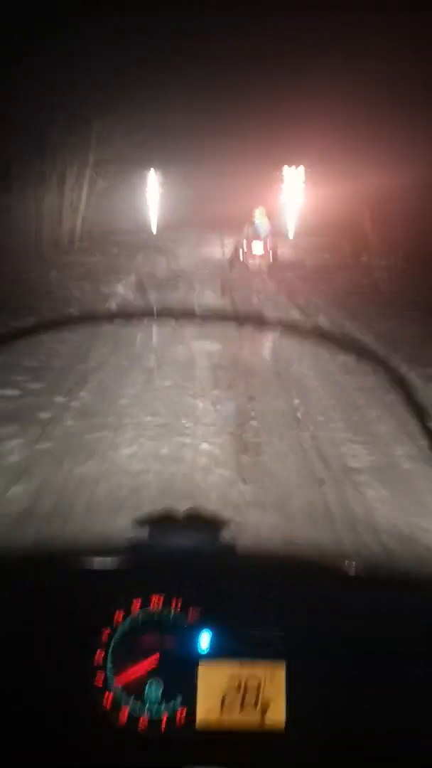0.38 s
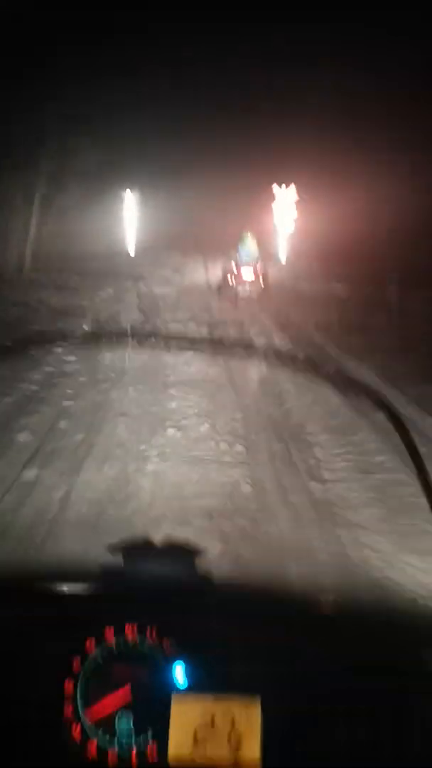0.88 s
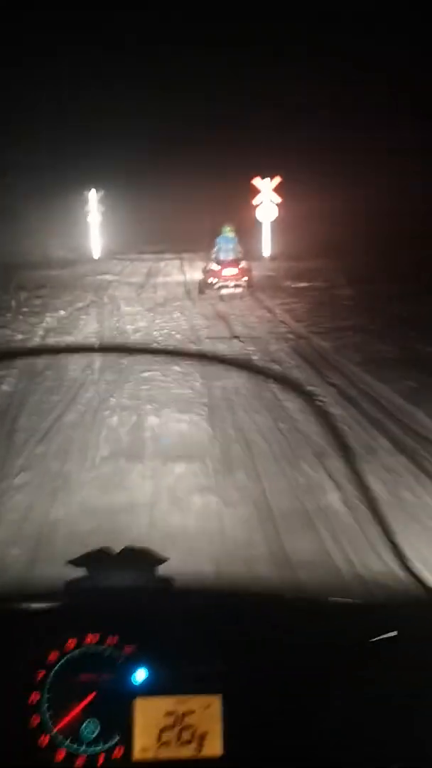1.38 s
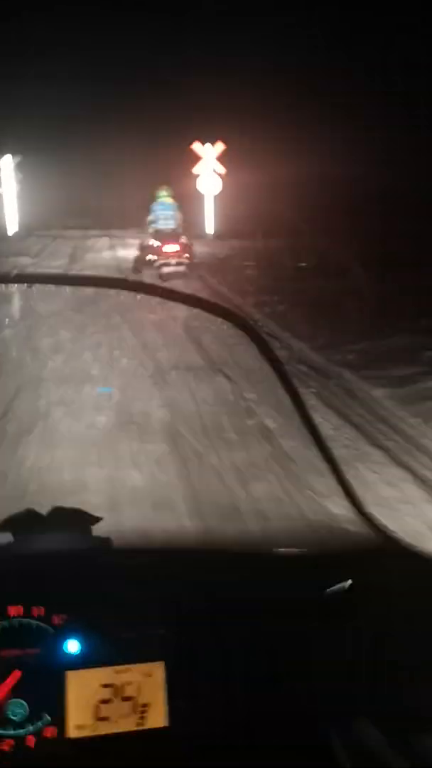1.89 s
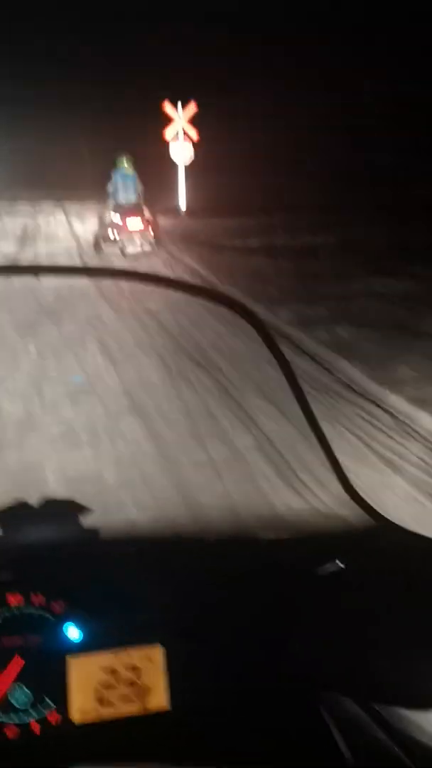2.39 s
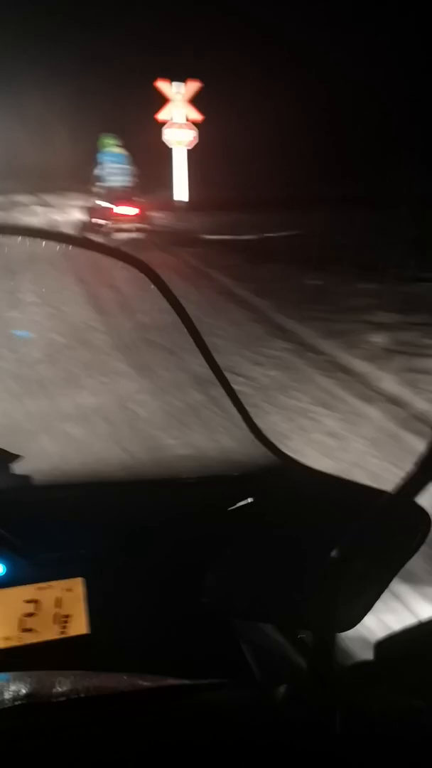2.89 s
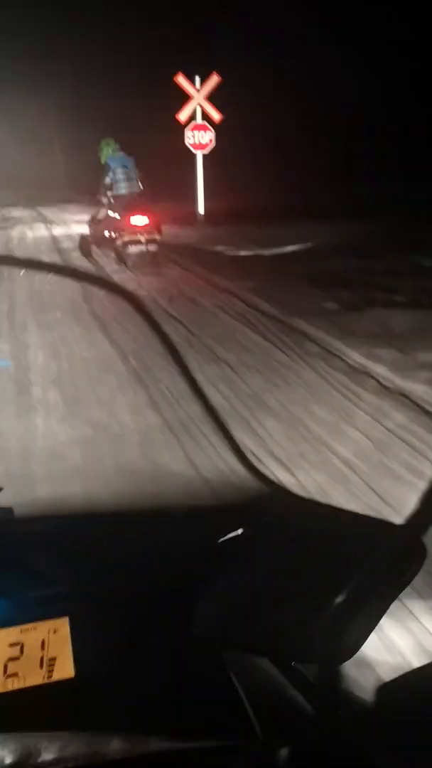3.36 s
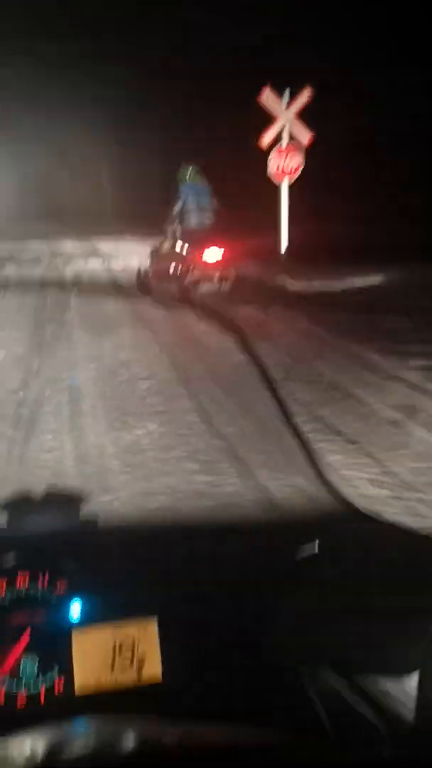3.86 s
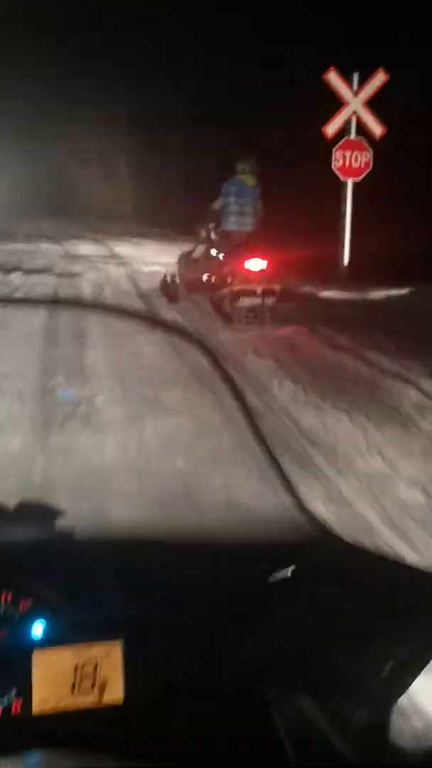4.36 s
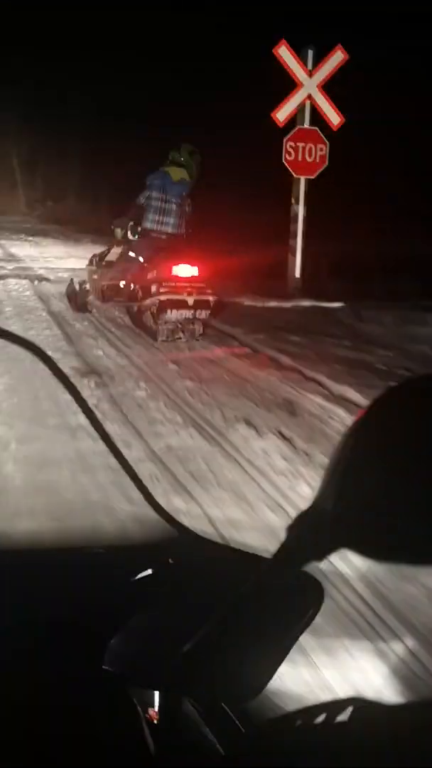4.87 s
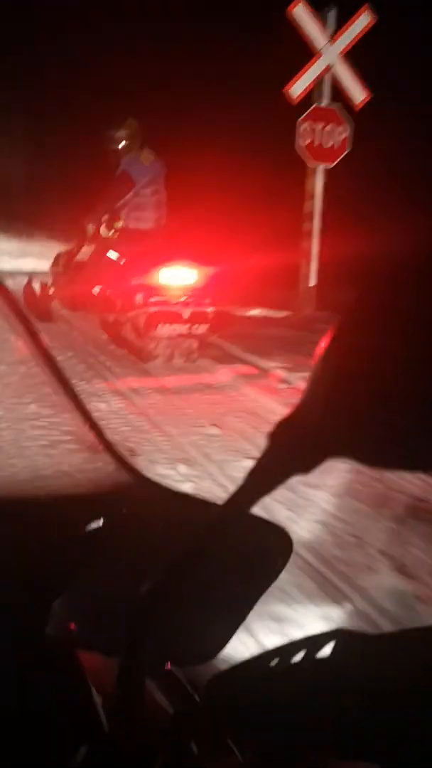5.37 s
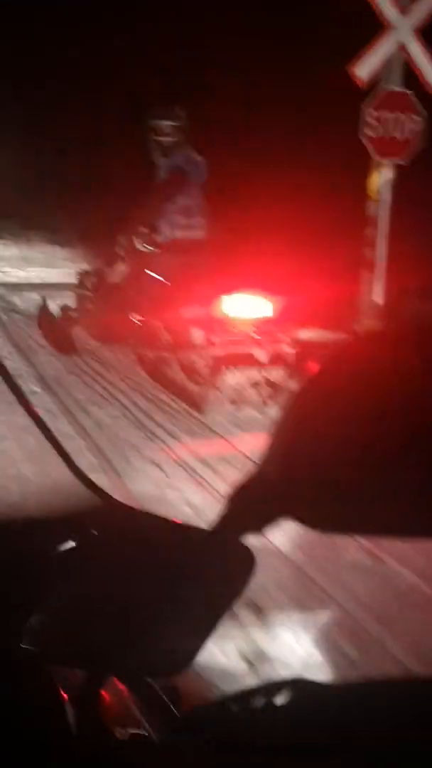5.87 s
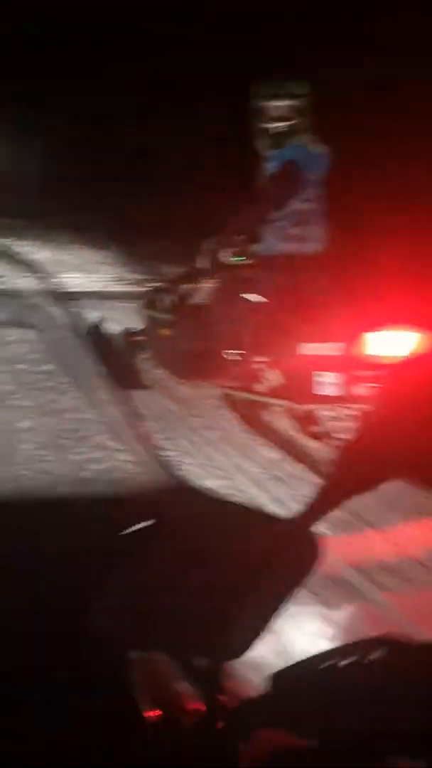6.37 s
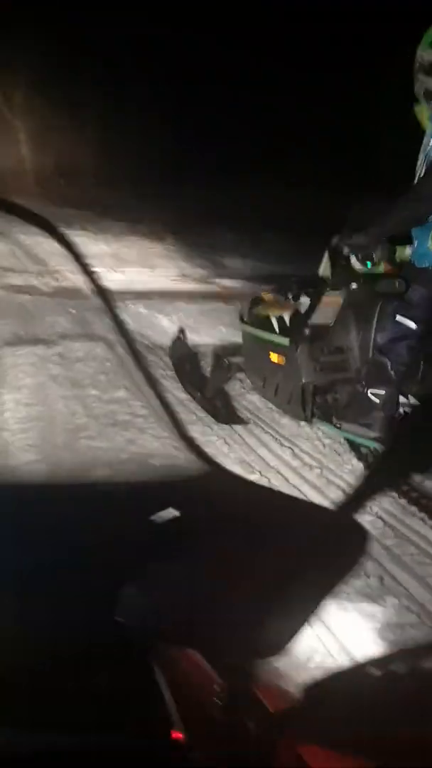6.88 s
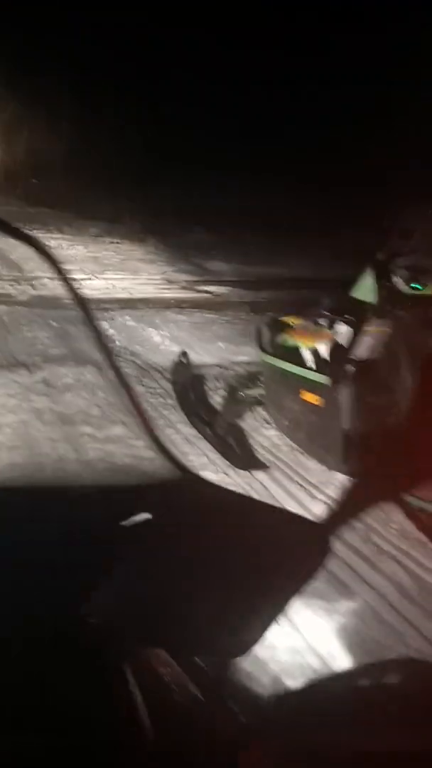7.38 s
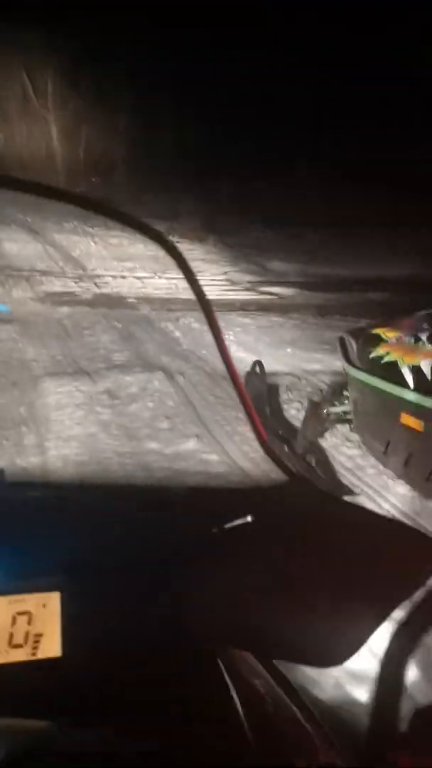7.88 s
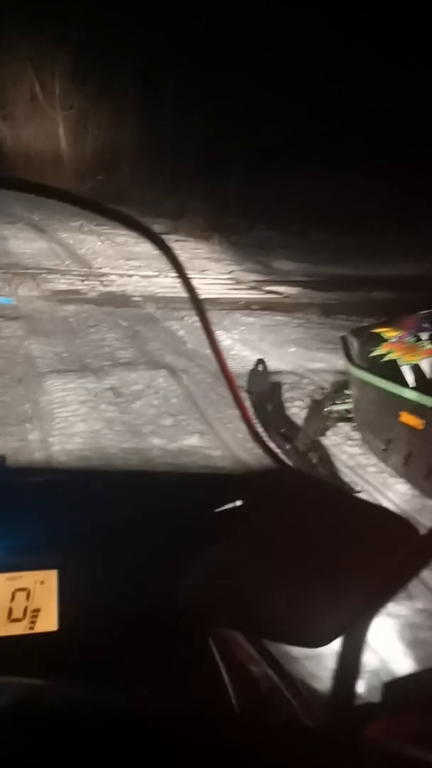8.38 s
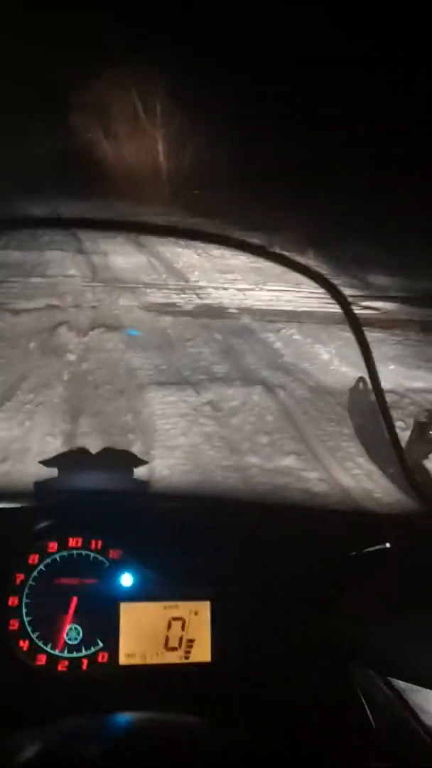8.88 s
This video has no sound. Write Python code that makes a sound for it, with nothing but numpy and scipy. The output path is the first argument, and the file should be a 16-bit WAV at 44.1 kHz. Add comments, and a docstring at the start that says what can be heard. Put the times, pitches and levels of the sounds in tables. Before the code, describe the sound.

An onboard stereo microphone rides a snowmobile on an open snowy trail. From 0 s a buzzy two-stroke drone runs fairly fast over grainy track and ski hiss, with a knock near 0.25 s and low bumps around 0.6-0.8 s. The pitch slides down until 2.5 s, jumps up briefly around 2.9 s, then sinks again, stumbling, with weak firing near 4.1-4.4 s. Hiss swells about 4.1 s, then thins and dulls. Another idling sled becomes noticeable around 4.5 s. Near 5.7 s come a bump, faint thin whines and panel buzz; a knock lands at 6.2 s and a short rev peaks about 6.55 s. By 7-8 s the neighbour is closest, clattering with bright pulsed ticks. The rider's engine idles lumpily, lifts slightly near 8.45 s, and both continue to 9 s as the hiss vanishes.

```python
"""The two-stroke twin of a snowmobile drones at its firing rate and stumbles as firings come weak: summed
orders. Out on a snow trail the sled slows and stops; track and skis hiss until then, made of coloured noise.
Clatter and ticking rise from the sled's own track near 4.5 s; later a second sled idles beside the stop and
swells as the two draw level: drone, clatter, ticking and a struck pin. Bumps, bodywork knocks, a buzzing panel
and faint whines ride along, all heard at two microphone ports."""
import sys
import numpy as np
from scipy import signal
from scipy.fft import rfft, irfft
from scipy.io import wavfile
from scipy.ndimage import uniform_filter1d, minimum_filter1d

SR = 44100
rng = np.random.default_rng(int(sys.argv[2]) if len(sys.argv) > 2 else 0)


def volts(x):
    """Linear amplitude factor 10**(x/20) for a level x in dB, scalar or array-like."""
    e = np.asarray(x, float) / 20
    return 10 ** e


def generate_wav(sig):
    """Save sig (samples, or channels by samples) to the path in sys.argv[1] as 16-bit PCM at SR."""
    pcm = np.round(np.clip(np.atleast_2d(sig).T, -1, 1) * 32767).astype(np.int16)
    wavfile.write(sys.argv[1], SR, pcm)


N = 396900
STEP = 20   # bass sources are computed at every 20th sample


def at_hz(points, hz):
    """Read a spectrum on a log-frequency axis."""
    points_hz, values = np.transpose(points)
    return np.interp(np.log(hz + 1e-9), np.log(points_hz), values)


def in_time(rows, step=1):
    """Curve columns at every step-th sample."""
    s, *columns = np.transpose(rows)
    return [np.interp(np.arange(0, N, step) / SR, s, column) for column in columns]


def swells(rows, step=1):
    """Smooth humps in dB, each centred on its time and gone half its length away."""
    t = np.arange(0, N, step) / SR
    return sum(db * np.cos(np.pi * np.clip((t - s) / length, -.5, .5)) ** 2 for s, length, db in rows)


def rms_one(x):
    """Scale to rms 1."""
    return x / np.sqrt(np.mean(x ** 2) + 1e-20)


def full_rate(x):
    """Bring a bass source to the full sample rate."""
    return signal.resample_poly(x, STEP, 1, axis=1, padtype="line")


def drift(rate_hz, step=1):
    """Random wander around a given rate, without its slowest part; spread 1."""
    r = np.exp(-80 * np.pi * rate_hz / SR)   # computed at every 40th sample
    slow = signal.lfilter([1], [1, -2 * r, r * r], rng.standard_normal(N // 40 + 2002))
    slow = slow - uniform_filter1d(slow, int(3 * SR / 40 / rate_hz))
    slow = rms_one(slow[2000:])   # the filter has settled by here
    return np.interp(np.arange(0, N, step) / 40, np.arange(len(slow)), slow)


def ring(strikes, hz, t60):
    """A struck mode: a two-pole resonator that falls 60 dB in t60 seconds."""
    r, w = volts(-60 / (t60 * SR)), 2 * np.pi * hz / SR
    return signal.lfilter([0, np.sin(w)], [1, -2 * r * np.cos(w), r * r], strikes + 1e-18)


def bursts(turns, share, fall):
    """Gain whose given share jumps at each firing and falls away towards the next."""
    return 1 - share + share * rms_one(np.exp(-fall * (turns % 1)))


# How the microphone ports favour left. Each row: frequency in Hz, left minus right in dB.
LEAN = [(60, 0.0), (130, 0.5), (290, 0), (640, -3), (1410, -4.5), (3100, -2), (6820, -4.5), (15000, -1)]
# How the ports differ in phase. Each row: frequency in Hz, lead of the left port in radians.
LEAD = [(0, 0), (80, -.28), (170, -.52), (350, -1.35), (600, -2.6), (1550, .8), (1810, 3.2), (2580, 2.4),
        (4130, -2.9), (6290, -9.1), (9130, -12.5), (15200, -22)]


def ports(hz):
    """Complex gain of the left and right microphone port."""
    half = np.array([[.5], [-.5]])
    return volts(at_hz(LEAN, hz) * half) * np.exp(1j * np.interp(hz, *np.transpose(LEAD)) * half)


def tone(turns, hz, order, phase=None):
    """One multiple of a rotation at the two ports, about rms 1; phase in turns is random unless given."""
    phase = rng.random() if phase is None else phase
    return np.sqrt(2) * np.real(ports(hz * order) * np.exp(2j * np.pi * (order * turns + phase)))


# How alike noise is at the two ports. Each row: frequency in Hz, likeness from 0 to 1.
LIKENESS = [(30, .995), (60, .995), (130, .98), (300, .95), (550, .6), (1000, .55), (2000, .45), (4000, .3),
            (8000, .2), (15000, .35)]


def noise(spectrum, rings=(), shared_db=1.0, own_db=1.0, flicker_hz=12, step=1):
    """Stereo noise of a given colour and resonances; wide bands flicker together and alone; rms 1."""
    n = N // step
    hz = np.fft.rfftfreq(n, step / SR)
    low_hz, high_hz = spectrum[0][0], spectrum[-1][0]
    power = volts(at_hz(spectrum, hz)) ** 2 * (hz > low_hz) * (hz < high_hz)
    for centre_hz, width_hz, ring_db in rings:
        power = power + volts(ring_db) ** 2 / (1 + (2 * (hz - centre_hz) / width_hz) ** 2) ** 2
    mid, side = rfft(rng.standard_normal((2, n))) * np.sqrt(power)
    alike = np.clip(at_hz(LIKENESS, hz), 0, 1)
    pair = np.sqrt(1 + alike) * mid + np.sqrt(1 - alike) * side * [[1], [-1]]
    pair = pair * ports(hz)
    # overlapping bands, each centred at three times the frequency of the last
    band, out = np.log(hz + 1) / np.log(3), 0
    first, last = np.round(np.log([low_hz, high_hz]) / np.log(3)).astype(int)
    for k in range(first, last + 1):
        share = np.clip(1 - abs(np.clip(band, first, last) - k), 0, 1)
        out = out + irfft(pair * share, n) * volts(own_db * drift(flicker_hz, step))
    return rms_one(out * volts(shared_db * drift(flicker_hz, step)))


# Faint thin whines. Each row: start in seconds, end in seconds, start pitch in Hz, end pitch in Hz,
# level in dB before it wavers.
WHINES = [(.85, 1.35, 2130, 2090, -46), (0, 1.2, 1140, 1100, -49), (5.57, 6.47, 1570, 1520, -43),
          (5.65, 5.95, 2300, 2180, -52), (5.4, 5.75, 2560, 2570, -56), (5.65, 6.45, 2410, 2350, -54),
          (5.68, 6.05, 3280, 3220, -66), (5.6, 6.1, 5230, 5300, -65), (6.05, 6.5, 5250, 5020, -65),
          (6.4, 6.9, 1420, 1340, -52), (6.93, 7.35, 2570, 2560, -53)]


def whines():
    """Thin wavering sines that glide a little, fading in and out."""
    t, out = np.arange(N) / SR, np.zeros(N)
    for start, end, start_hz, end_hz, level_db in WHINES:
        hz = np.interp(t, [start, end], [start_hz, end_hz]) + 35 * drift(40)
        fade = np.sin(np.pi * np.clip((t - start) / (end - start), 0, 1)) ** .5
        out += volts(level_db + 3.9 * drift(8.3)) * fade * np.sin(2 * np.pi * np.cumsum(hz) / SR)
    return out * volts([[-1.5], [1.5]])


# Orders of the neighbour's drone. Each row: multiple of its firing rate, relative level in dB.
NEIGHBOUR_ORDERS = [(1, -7), (2, 3)]


def neighbour_drone(turns, hz):
    """The idling exhaust: low orders of the firing rate, each swelling at random."""
    return sum(volts(db + 5.1 * drift(4.1)) * tone(turns, hz, k) for k, db in NEIGHBOUR_ORDERS)


# Colour of the clatter. Each row: frequency in Hz, relative density in dB per Hz.
CLATTER = [(310, -29), (520, -5), (790, -8), (1130, -15), (1390, -12.5), (1550, 3), (1740, -11),
           (2220, -3.5), (3200, -26), (4160, -61), (7040, -120)]
# Panels ringing in it. Each row: centre in Hz, width in Hz, relative density in dB.
CLATTER_RINGS = [(938, 67, -4), (1870, 300, -0.5), (2080, 63, -3), (2450, 74, -4.5), (2590, 40, -3.5)]


def clatter(turns, burst):
    """Resonant noise that bursts mildly with each firing."""
    rattle = noise(CLATTER, CLATTER_RINGS, shared_db=.4, own_db=.5, flicker_hz=25)
    return rattle * bursts(turns, .35 * burst, fall=2.2)


# Resonances of the neighbour's hood. Each row: centre in Hz, width in Hz, relative density in dB.
HOOD = [(1150, 160, -5.5), (1350, 59, -6.5)]
# The hood is shaded until the sleds draw level. Each row: time in seconds, gain in dB.
HOOD_IN_VIEW = [(4.3, -7), (5.8, -14.5), (6.3, -6.5), (6.85, 3.5), (7.3, 3)]


def hood():
    """Noise ringing in the hood, brighter once the hood comes into view."""
    shade_db, = in_time(HOOD_IN_VIEW)
    return volts(shade_db) * noise([(1050, -30), (1450, -30)], HOOD, shared_db=.5, own_db=.3, flicker_hz=30)


# Colour of the ticking. Each row: frequency in Hz, relative density in dB per Hz.
TICKING = [(1650, -44), (2800, -1.5), (3050, -14.5), (3390, -3), (4100, -6.5), (4990, -4), (6080, -5),
           (7510, -1.5), (8120, -4.5), (9960, -27), (15100, -33)]
# Resonances in it. Each row: centre in Hz, width in Hz, relative density in dB.
TICKING_RINGS = [(3100, 27, -2.5), (5100, 190, 2), (6950, 540, -3), (7700, 120, 3)]


def ticking(turns, burst):
    """Bright noise that bursts once a firing."""
    ticks = noise(TICKING, TICKING_RINGS, shared_db=.9, own_db=.9, flicker_hz=30)
    return ticks * bursts(turns, burst, fall=3.2)


def pin(turns, burst):
    """A bright pin struck at each firing, with uneven strength, rings briefly at 7900 Hz."""
    strikes = np.diff(np.floor(turns), prepend=0) * volts(3.5 * drift(30)) * burst
    return ring(uniform_filter1d(strikes, size=3), 7900, t60=0.026) * volts([[-2.5], [2.5]])


# The clattering group: mostly the sled's own track near 4.5 s, then the second sled. Each row: time in seconds,
# # loudness in dB about its loudest, share of the ticking that bursts with each firing from 0 to 1.
TRACK_AND_NEIGHBOUR = [(3.9, -14.5, 0.09), (4.5, -2.5, .085), (5.3, -10.5, 0.1), (5.83, -7, .18), (6.5, -6, .23),
                       (6.9, -4.5, 0.19), (7.4, -2, 0.32), (7.7, 0, 0.33), (8.05, -2, .27), (8.95, -1.5, 0.28)]
# Its idle. Each row: time in seconds, mean firing rate in Hz.
NEIGHBOUR_IDLE = [(6.2, 54.5), (7.2, 53.24), (8.1, 53), (9, 52.1)]


def track_and_neighbour():
    """Clatter and ticking of the own track near 4.5 s, then the idling sled, which swells, its ticking more
    pulsed as the sleds draw level."""
    near_db, burst = in_time(TRACK_AND_NEIGHBOUR)
    hz, = in_time(NEIGHBOUR_IDLE)
    turns = np.cumsum(hz * (1 + 0.021 * drift(3.0))) / SR   # the idle hunts by about 2 %
    drone = volts(-30 - .4 * near_db) * neighbour_drone(turns, hz)   # swells less than the rest
    out = drone + volts(-33.5) * clatter(turns, burst) + volts(-41.5) * hood()
    out = out + volts(-42.5) * ticking(turns, burst) + volts(-30.5) * pin(turns, burst)
    return volts(near_db) * out


# Pitches of the side panel. Each row: centre in Hz, width in Hz, relative density in dB.
PANEL = [(1498, 150, 2), (1610, 68, 3.5)]
# Spells of buzzing. Each row: start in seconds, end in seconds, level in dB.
BUZZES = [(.42, .56, -40), (1.4, 1.66, -42), (5.591, 5.85, -43), (5.849, 6.46, -39.5), (6.888, 7.26, -38),
          (7.387, 7.84, -41), (7.84, 8.4, -45), (8.4, 8.694, -40), (8.7, 9.049, -35)]


def panel():
    """A side panel buzzes at its own pitches in spells, shaken once a firing."""
    turns, t = np.cumsum(in_time(ENGINE)[0]) / SR, np.arange(N) / SR
    spells, edge_s = 0, 0.037
    for start, end, db in BUZZES:
        spells = spells + volts(db) * np.clip(np.minimum(t - start, end - t) / edge_s + .5, 0, 1)
    buzz = noise([(1300, -40), (1800, -40)], PANEL, shared_db=.4, own_db=.3, flicker_hz=30)
    return spells * volts(2.0 * drift(9.4)) * buzz * bursts(turns, share=0.19, fall=1.7)


# Knocks on the bodywork. Each row: time in seconds, relative strength in dB,
# tilt in dB per octave above the lowest mode.
KNOCKS = [(0.256, -9, -6), (5.031, -22, -2), (5.699, -26, 0.1), (6.225, -14.5, .3), (6.231, -21, 0.1),
          (7.227, -28, 0.1)]
# Modes of the bodywork. Each row: frequency in Hz, relative level in dB, 60 dB decay time in seconds.
BODYWORK = [(718, -2, 0.022), (1216, -3, 0.028), (1460, -7, .04), (1970, -3.5, 0.027), (2380, -5, 0.028),
            (2840, -17, 0.076), (3860, -17.5, 0.015), (5600, -19, 0.023), (7300, -13, .01)]


def knocks():
    """Each knock strikes every mode of the bodywork with a strength of its own."""
    s, strength_db, tilt_db = np.transpose(KNOCKS)
    luck_db, out = rng.normal(0, 1, (len(s), len(BODYWORK))), np.zeros(N)
    for k, (hz, level_db, t60) in enumerate(BODYWORK):
        octaves = np.log2(hz / BODYWORK[0][0])
        clicks = np.zeros(N)
        clicks[(s * SR).astype(int)] = volts(strength_db + level_db - 11.0 + tilt_db * octaves + luck_db[:, k])
        out += ring(clicks, hz, t60)
    return out * volts([[-1.5], [1.5]])


# Colour of the chassis rumble. Each row: frequency in Hz, relative density in dB per Hz.
RUMBLE = [(6, -11.5), (20, 1), (40, 6.5), (60, 4.5), (95, 5), (125, 0), (160, -18), (220, -37.5)]
# Bumps and smooth stretches under the track. Each row: centre in seconds, length in seconds, rumble in dB.
BUMPS = [(.61, .12, 9), (2.12, .1, -8), (2.8, .6, -7), (.83, .2, 9), (2.35, .3, 7), (3.56, .12, 7),
         (3.82, .2, 6), (4.2, .25, 10), (4.78, .3, 5), (5.75, .15, 7)]


def rumble():
    """Bumps shake the chassis: bass noise that follows part of the hiss's swing."""
    slowing_db = in_time(RIDE)[0] - RIDE[0][1]
    level_db = -18 + 0.56 * slowing_db + swells(BUMPS) + 2.0 * drift(3.6)   # the last term: random lumps
    return volts(level_db) * full_rate(noise(RUMBLE, shared_db=-1.5, own_db=-0.5, flicker_hz=5.6, step=STEP))


# Colour of the gas flutter. Each row: frequency in Hz, relative density in dB per Hz.
FLUTTER = [(76, -35.5), (130, -7.5), (193, -4.5), (275, -5), (323, -4.5), (367, -13.5), (419, -9.5),
           (552, -28.5), (600, -24.5), (780, -52.5), (1320, -120)]
# Its strength with the revs. Each row: firing rate in Hz, level in dB before the snow patches.
FLUTTER_WITH_REVS = [(75, -29.5), (85, -26.5), (95, -26), (105, -20.5), (120, -21), (135, -22),
                     (152, -21.5)]


def flutter():
    """Gas flutters in the pipe: low noise that changes with the revs and swells with the snow patches."""
    level_db = np.interp(in_time(ENGINE)[0], *np.transpose(FLUTTER_WITH_REVS)) + 0.76 * swells(SNOW_PATCHES)
    return volts(level_db) * full_rate(noise(FLUTTER, shared_db=0.6, own_db=1.7, flicker_hz=24.5, step=STEP))


# The ride to the stop. Each row: time in seconds, snow hiss in dB before the speed scales it,
# speed from 0 to 1.
RIDE = [(0, -28, 0.8), (1.5, -28, 0.86), (3, -28.5, 0.9), (4.15, -26.5, 0.77), (4.6, -28, 0.42),
        (5.1, -29, 0.39), (5.4, -33.5, 0.49), (6.3, -32, 0.24), (6.95, -40.5, 0.32), (9, -33.5, 0)]
# Hiss over changing snow. Each row: centre in seconds, length in seconds, swell or dip in dB.
SNOW_PATCHES = [(.05, 0.46, 2), (.52, 0.17, 2), (.63, .1, -1.5), (1.08, 0.35, 2.5), (2.25, 0.74, 2.5),
                (2.65, 0.76, 2), (3.53, 0.27, 2), (4.07, 0.42, 4.5), (5.76, 0.25, 4.5)]
# Colour of the hiss. Each row: frequency in Hz, relative density in dB per Hz.
SNOW = [(310, -32.5), (520, -7), (550, -5.5), (750, -3), (1010, -9.5), (1500, -7.5), (1700, -4), (2160, -2),
        (2670, -10.5), (4190, -15.5), (5710, -16.5), (6390, -16), (7790, -9), (10300, -34), (15100, -38)]
# Resonances in it. Each row: centre in Hz, width in Hz, relative density in dB.
SNOW_RINGS = [(1468, 130, -6), (2080, 400, -16.5), (5750, 370, -13.5), (7500, 120, -25)]


def snow():
    """Track and skis hiss over the snow, softer and duller with falling speed, until the sled stops."""
    level_db, moving = in_time(RIDE)
    hiss = noise(SNOW, SNOW_RINGS, shared_db=0.03, own_db=1.27, flicker_hz=22.4)
    hiss = volts(level_db + swells(SNOW_PATCHES)) * hiss
    dull = signal.sosfilt(signal.butter(2, 4500, fs=SR, output="sos"), hiss)
    return moving * (dull + moving * (hiss - dull))   # slow skis lose their sizzle


# The sled's own engine. Each row: time in seconds, firing rate in Hz, firing tone in dB before dropouts.
ENGINE = [(0.0, 152.1, -13.5), (0.4, 152, -14), (.95, 142.8, -13), (1.38, 130, -12.5), (1.78, 126.8, -12),
          (2.1, 117.4, -15), (2.53, 115.9, -13.5), (2.9, 136.2, -9), (3.3, 126.1, -11.5),
          (3.93, 113.3, -15), (4.4, 98.86, -11.5), (4.53, 101, -11.5), (4.62, 93.5, -9), (4.86, 88.4, -10),
          (5.46, 81.33, -8), (6.31, 77.14, -10), (6.43, 87.2, -6), (6.56, 94.75, -8.5), (6.79, 86.7, -8.5),
          (6.92, 87.6, -8), (7.27, 80.26, -9), (7.89, 75.25, -10), (8.22, 76.33, -7.5), (8.45, 85, -8),
          (8.72, 81.5, -8), (9.0, 78.85, -10)]
# What the exhaust pipe lets through. Each row: frequency in Hz, base level of one overtone in dB.
PIPE = [(40, -26.5), (70, -45), (160, -23.5), (190, -32), (230, -27), (270, -30), (315, -25), (400, -35.5),
        (470, -37), (520, -46.5), (700, -54.5)]
# The exhaust with the revs. Each row: firing rate in Hz, overtone lift in dB, cylinder mismatch in dB,
# base level of the lope in dB.
WITH_REVS = [(80.8, -0.5, -16, -22), (81.1, 0, -14.5, -26), (87.4, -2, -5, -27), (105, -5.5, 0.5, -25.5),
             (116.42, 2, -4.5, -25), (136.3, 5.5, -5.5, -25), (152, 1.5, 3, -28.5)]
# Brief dropouts of the firing tone. Each row: centre in seconds, length in seconds, change in dB.
MISFIRES = [(2.03, 0.15, -11), (2.5, 0.24, -9.5), (4.1, 0.4, -7.5), (4.43, 0.16, -16.5), (5.1, 0.055, -6),
            (1.85, 0.11, -7), (3.65, 0.052, -4), (5.6, .12, -4)]
# Blips of throttle that steady the firing. Each row: centre in seconds, length in seconds,
# change of stumble and lope in dB.
BLIPS = [(2.85, .8, -9), (6.45, .35, -11), (8.4, 0.63, -5)]
# Weak firings repeat over eight firings and put tones between the orders.
# Each row: multiple of the firing rate, level in dB about the lope.
LOPE = [(.375, -15.5), (.625, -1), (.75, 1), (.875, -12.5), (1.125, -5), (1.25, -15.5), (1.375, -14),
        (3.75, -14.5)]
# Faint lines that hold while the revs are low. Each row: multiple of the firing rate, base level in dB.
STEADY_ORDERS = [(2.75, -33), (3.25, -41)]


def engine():
    """Firing tone and overtones through the pipe; unequal cylinders add half orders, the lope eighth orders."""
    hz, tone_db = in_time(ENGINE, STEP)
    revs_hz, *laws = np.transpose(WITH_REVS)
    lift_db, mismatch_db, lope_db = [np.interp(hz, revs_hz, law) for law in laws]
    miss_db, steady_db = swells(MISFIRES, STEP), swells(BLIPS, STEP)
    turns = np.cumsum(hz) * STEP / SR   # counts firings
    # the firing tone runs 1 % below the firing rate and slides against the overtones
    out = volts(tone_db + miss_db) * tone(turns, hz, 0.99, phase=0)
    for half in [1, *range(3, 15)]:
        level_db = at_hz(PIPE, hz * half / 2) + lift_db + 0.19 * miss_db   # dropouts touch overtones less
        level_db = level_db + mismatch_db * (half % 2) + 1.5 * drift(2.77, STEP)
        out = out + volts(level_db) * tone(turns, hz, half / 2, phase=0)
    # each firing has a strength of its own, spread by 0.14 on a closed throttle
    luck = rng.standard_normal(N // STEP)
    stumble = 0.14 * volts(steady_db) * np.interp(turns, np.arange(len(luck)), luck)
    out = out * np.clip(1 + stumble, .45, 1.6)
    # the lope comes and goes, and rises in a dropout
    lope_db = lope_db + steady_db - 0.49 * miss_db + 1.6 * drift(2.5, STEP)
    for order, db in LOPE:
        muffled_db = -.08 * np.maximum(hz * order - 290, 0)   # the pipe dulls those that climb with the revs
        level_db = lope_db + db + muffled_db + 2.5 * drift(2.5, STEP)
        out = out + volts(level_db) * tone(turns, hz, order)
    for order, db in STEADY_ORDERS:
        fade_db = 2.5 * np.maximum(hz - 92, 0)   # fade above 92 firings per second
        out = out + volts(db - fade_db + 3.6 * drift(1.8, STEP)) * tone(turns, hz, order)
    return full_rate(out)


def scene():
    """All sources at the two microphone ports."""
    return whines() + track_and_neighbour() + panel() + knocks() + rumble() + flutter() + snow() + engine()


def top_cut(x):
    """Nothing passes above the cut-off."""
    return signal.sosfilt(signal.butter(12, 15710, fs=SR, output="sos"), x)


def record(dry):
    """A limiter ducks the loudest beats and recovers fast, then the top is cut."""
    ceiling_db, release_db_per_s = -.9, 80.
    ramp = release_db_per_s * np.arange(N) / SR
    level_db = 20 * np.log10(abs(dry).max(0) + 1e-9)
    held_db = np.maximum.accumulate(level_db + ramp) - ramp   # peaks, released at a steady rate
    over_db = np.maximum(held_db - ceiling_db, 0)
    duck = minimum_filter1d(volts(-over_db), size=257)
    duck = uniform_filter1d(duck, size=257)
    mix = signal.sosfilt(signal.cheby2(16, 70, 15350, fs=SR, output="sos"), dry * duck)
    return top_cut(mix)


dry = scene()
out = record(dry)
generate_wav(out)
```